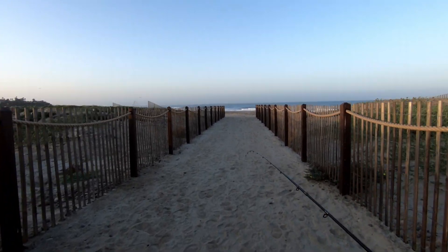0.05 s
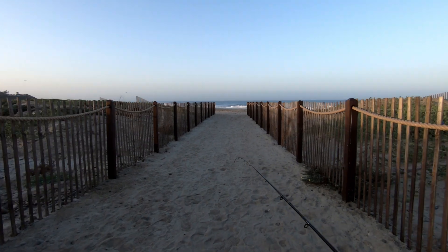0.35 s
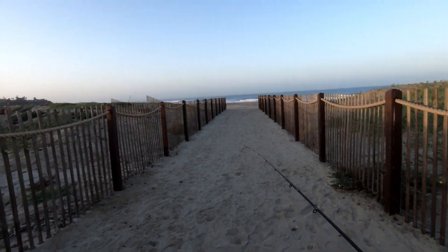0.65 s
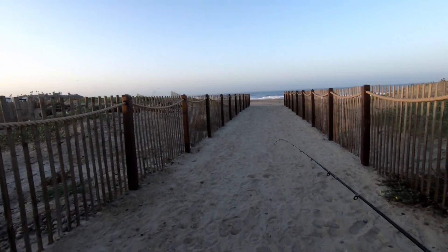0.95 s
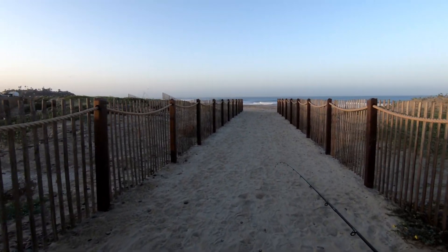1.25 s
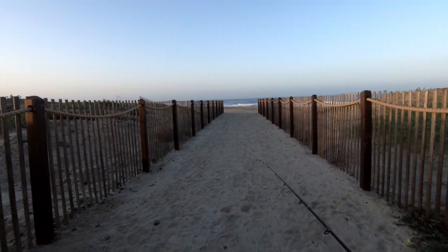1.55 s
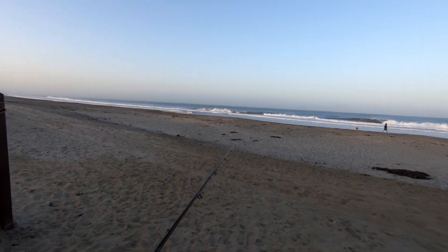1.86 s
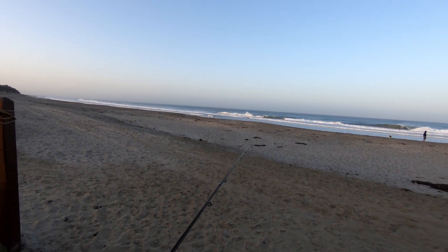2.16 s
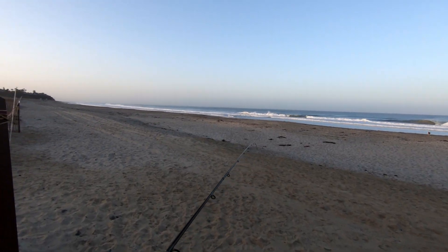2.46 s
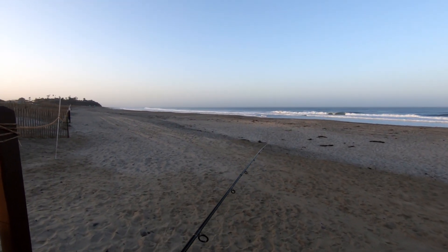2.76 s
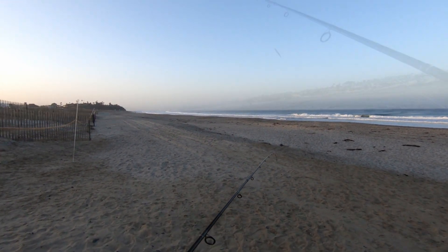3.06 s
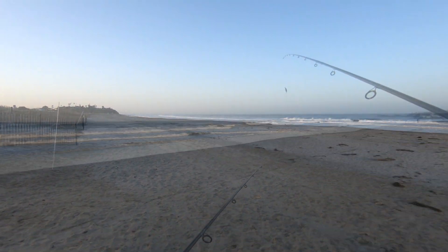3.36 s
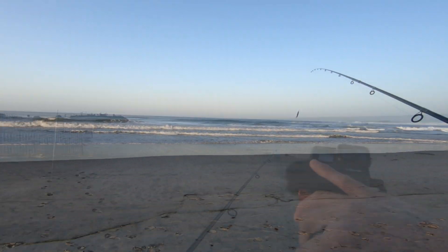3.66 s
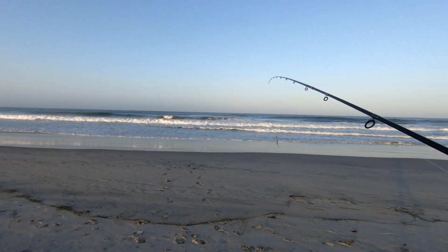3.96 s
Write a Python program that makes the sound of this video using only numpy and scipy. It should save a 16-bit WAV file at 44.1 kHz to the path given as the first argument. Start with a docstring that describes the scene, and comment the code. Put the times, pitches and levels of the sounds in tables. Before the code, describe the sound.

Fishing tackle rattles in bright ticks over soft sandy footsteps, wind rumble and surf.

```python
"""A walk over dry sand to the sea, carrying a fishing rod. From the start soft steps scuff and the
tackle rattles in bursts of tiny bright ticks, while wind rumbles on the microphone and surf washes
far away. Near two seconds the beach opens out with a low hum; the rattle gets busier and a few
footfalls thud. In the last second the rod takes a double tap and the breaking waves swell up close."""
import sys
import numpy as np
from scipy import signal
from scipy.fft import rfft, irfft, next_fast_len
from scipy.io import wavfile
from scipy.ndimage import uniform_filter1d, map_coordinates

SR = 44100
rng = np.random.default_rng(int(sys.argv[2]) if len(sys.argv) > 2 else 0)


def pcm_store(signal):
    """Save signal as 16-bit PCM."""
    levels = np.round(np.clip(np.atleast_2d(signal), -1, 1) * 32767)
    wavfile.write(sys.argv[1], SR, levels.astype(np.int16).T)


N = 176400


def tackle():
    """Small parts strike each other: loud ticks stand out of spells of fine, uneven rattling."""
    # accent ticks (time [s], level before trim [dB])
    ticks = [(0.2086, -24), (0.214, -21), (0.2176, -25), (0.2301, -25), (0.2615, -23.5), (0.2639, -30),
             (0.3342, -30), (0.3433, -33), (0.3625, -25), (0.415, -31), (0.7327, -25), (0.7361, -43),
             (0.7458, -26), (0.7588, -26), (1.2115, -37.5), (1.7515, -33.5), (1.8428, -21), (1.857, -24),
             (1.8663, -36), (1.8857, -29), (1.8906, -31), (2.0042, -28), (2.0653, -29), (2.1528, -32),
             (2.1819, -24.5), (2.2355, -27.5), (2.3068, -28), (2.3827, -28), (2.4594, -25), (2.5084, -24),
             (2.525, -38), (2.565, -34), (2.6649, -22), (2.6673, -27), (2.6702, -26), (2.7258, -18),
             (2.7348, -34), (2.7391, -23), (2.765, -24.5), (2.7891, -20), (2.8124, -19.5), (2.8927, -15),
             (2.907, -29), (2.9255, -23), (2.9306, -21), (2.9368, -27), (2.9405, -24), (2.9549, -23),
             (2.9624, -22.5), (2.9665, -24), (3.057, -27), (3.08, -20), (3.0949, -25.5), (3.2231, -17.5),
             (3.251, -26), (3.3456, -27)]
    # spells of rattling (start [s], end [s], level before trim [dB])
    rattles = [(0.122, .285, -35.5), (.31, .42, -33.5), (.705, .8, -34.5), (1.827, 1.95, -36.5),
               (1.974, 2.21, -37), (2.218, 2.36, -36), (2.361, 2.585, -33.5), (2.653, 2.845, -34),
               (2.865, 3.0, -38), (2.998, 3.14, -34.5), (3.177, 3.29, -34.5), (3.294, 3.42, -41)]
    # tone of one tick (frequency [Hz], gain [dB])
    tick_colour = [(1500, -40), (3500, -26), (5200, -16), (6850, -9), (7250, -0.5), (7700, -4.5),
                   (8300, -0.5), (8900, -3.5), (9500, -5), (10100, -2.5), (10650, -0.5), (11450, -1.5),
                   (12200, -8.5), (13800, -7), (14800, -4.5), (16000, -11)]
    ticks_per_s, spread_db, trim_db = 130, 2.5, -1.5
    contacts = list(ticks)
    for start, end, db in rattles:
        for time in np.arange(start, end, 1 / ticks_per_s):
            jitter = rng.normal(0, 0.25) / ticks_per_s
            accent_db = spread_db * np.clip(rng.normal(), -2, 2)
            contacts.append((time + jitter, db + accent_db))
    envelope = fade(t60=0.0063) + amp(-9) * fade(t60=0.029)  # sharp tick, faint tail
    return amp(trim_db) * impacts(contacts, tick_colour, envelope, snap=3.6)


def sparkle(rattle):
    """The rattle turns brighter and duller as the gear swings."""
    # high-shelf ride (time [s], gain [dB])
    shelf = [(0, 1), (.4, -1), (.75, -9), (1.8, 6), (2.25, 5), (2.4, 1), (2.8, -2), (3.05, 0), (3.4, -2)]
    shelf_hz = 12500
    treble = filtered(rattle, lambda hz: 1 - 1 / (1 + (hz / shelf_hz) ** 10))
    return rattle + (level(shelf) - 1) * treble


def metal_clacks():
    """A metal part takes harder hits and rings high and short."""
    # hits (time [s], level [dB])
    hits = [(.116, -21.5), (.119, -23.5), (0.668, -22)]
    # ring of the metal (frequency [Hz], gain [dB], t60 [s])
    modes = [(4436, -21, .022), (7100, -13, .02), (8100, -1, .011), (8300, -3.5, .012), (9550, -6, .011),
             (10400, -7, .012), (12700, -7, .012), (13400, 1, .012), (14090, -6, .012)]
    return ringing_hits(hits, modes)


def rod_taps():
    """A quick double tap sets the rod ringing."""
    # taps (time [s], level [dB])
    taps = [(3.1542, -29), (3.1565, -26)]
    # ring of the rod (frequency [Hz], gain [dB], t60 [s])
    modes = [(2579, -3, .03), (3530, 2, 0.021), (4480, -2, 0.018), (5450, -4, .014), (6520, -1.5, 0.015),
             (7940, -1, .013), (9572, -5, .013), (10500, -3, .013), (13400, -3, .013), (15300, -2, .013)]
    return ringing_hits(taps, modes)


def gear_knocks():
    """The carried gear bumps with dull midrange knocks."""
    # knocks (time [s], level [dB])
    knocks = [(.94, -35), (.947, -36), (1.08, -43), (1.579, -29.5), (1.5862, -26.5), (2.078, -30.5),
              (2.79, -34), (3.345, -31), (3.355, -30), (3.382, -32)]
    # tone of one knock (frequency [Hz], gain [dB])
    knock_colour = [(400, -13), (900, 8), (1180, 14), (1500, 4), (2000, 7), (2800, -4.5), (3500, 4.5),
                    (4300, 4), (5500, -11), (9000, -11), (16000, -23)]
    return impacts(knocks, knock_colour, fade(t60=0.021), snap=5.1)


def footsteps():
    """Sand gives and slides under the feet; the heavier steps thud."""
    # soft presses into deep sand (peak time [s], rise [s], fall [s], level [dB])
    presses = [(.4, .06, 0.15, -44.5), (.92, 0.11, 0.16, -45.5), (1.08, 0.054, 0.06, -51),
               (1.49, 0.071, 0.19, -43.5), (2.38, 0.077, 0.072, -45), (3.37, .05, 0.055, -50)]
    # their muffled tone (frequency [Hz], gain [dB])
    press_colour = [(500, 6), (1400, 5), (2200, 3), (3500, -1.5), (4800, -6.5), (6200, -3), (7500, -15),
                    (11000, -15), (16000, -26)]
    # dry grains sliding under the soles (peak time [s], rise [s], fall [s], level [dB])
    scuffs = [(.115, 0.023, 0.11, -51.5), (.21, .06, 0.057, -52), (.37, 0.059, 0.17, -49),
              (.76, 0.077, 0.21, -52), (1.08, .09, 0.087, -58.5), (1.48, 0.066, 0.26, -53),
              (1.85, 0.023, 0.23, -51), (2.39, 0.087, 0.087, -39), (2.5, 0.058, 0.078, -55.5),
              (2.68, 0.025, 0.14, -57), (2.94, 0.17, 0.2, -43.5), (3.235, 0.023, 0.041, -49),
              (3.36, 0.039, 0.058, -44.5)]
    # their bright hiss (frequency [Hz], gain [dB])
    scuff_colour = [(800, -9), (2000, -9), (3500, -5), (5200, -3), (7200, 1.5), (8700, 1), (11000, -0.5),
                    (13000, -7), (16000, -6)]
    # footfalls felt through the body (time [s], level [dB])
    thuds = [(2.029, -21), (2.521, -12), (2.785, -29)]
    thud_hz, attack_s = 66, 0.006
    out = sand_swells(presses, press_colour) + sand_swells(scuffs, scuff_colour)
    decay = fade(t60=0.083)
    t = np.arange(len(decay)) / SR
    thud = decay * (1 - np.exp(-t / attack_s)) * np.sin(2 * np.pi * thud_hz * t)
    for time, db in thuds:
        place(out, time, db, thud)
    return out


def wind():
    """Air buffets the microphone: slow sub-bass gusts with a rumble above them."""
    # gust ride (time [s], level before lift [dB])
    gust_ride = [(0.0, -14), (0.04, -31), (0.1, -21.5), (0.22, -36), (0.37, -13.5), (0.5, -20), (0.53, -17),
                 (0.66, -28.5), (0.7, -26.5), (0.98, -21), (1.14, -18.5), (1.21, -24.5), (1.28, -15),
                 (1.39, -24), (1.45, -17.5), (1.78, -23.5), (2.25, -15.5), (2.29, -21), (2.55, -14.5),
                 (2.66, -22), (2.78, -21), (4.0, -30.5)]
    # gust tone (frequency [Hz], gain [dB])
    gust_colour = [(1, -34), (5, 0), (10, 3.5), (20, -4.5), (35, -9.5), (55, -17.5), (100, -40),
                   (300, -75.5)]
    # rumble ride (time [s], level [dB])
    rumble_ride = [(0.0, -26), (0.1, -27.5), (0.44, -25.5), (0.95, -27), (0.98, -24), (1.31, -28),
                   (1.76, -25), (1.8, -25.5), (1.82, -22.5), (2.05, -21), (2.18, -25), (2.21, -21.5),
                   (2.51, -23), (2.53, -20.5), (2.6, -27), (2.77, -21), (3.33, -25.5), (4.0, -23.5)]
    # rumble tone (frequency [Hz], gain [dB])
    rumble_colour = [(5, -27), (20, -11), (50, 1.5), (80, 1.5), (125, -2.5), (220, -5.5), (320, -14),
                     (480, -26), (1000, -38.5), (3000, -74)]
    lift_db = 2
    gusts = amp(lift_db) * level(gust_ride) * noise_bed(gust_colour, patchy_db=-0.67)
    rumble = level(rumble_ride) * noise_bed(rumble_colour, patchy_db=0.46)
    return gusts + rumble


def surf():
    """Breaking waves wash down the fenced path, across the open beach, then close at the water's edge."""
    # surf ride at each spot (time [s], level [dB])
    path_ride = [(0, -32), (.25, -32), (.45, -34), (.7, -31.5), (1.05, -35.5), (1.35, -35), (1.7, -39),
                 (2.1, -53), (4, -57)]
    beach_ride = [(0, -51), (1.3, -44), (1.85, -32.5), (2.4, -34), (2.8, -35), (3.2, -35.5), (4, -35)]
    near_ride = [(0, -87), (3.0, -67), (3.2, -34.5), (3.4, -28), (3.6, -24.5), (3.8, -22), (4, -20)]
    # surf tone at each spot (frequency [Hz], gain [dB])
    path_colour = [(100, -12), (400, -3), (560, -4), (800, 2), (1150, -2.5), (1500, -9), (2200, -20),
                   (3300, -24.5), (4800, -35), (6200, -31), (7500, -36), (11000, -42), (16000, -57)]
    beach_colour = [(100, -4.5), (400, 1.5), (800, 1), (1200, -3.5), (1600, -8.5), (2200, -18), (3000, -23),
                    (4200, -25), (6000, -38.5), (16000, -51)]
    near_colour = [(71, -36), (120, -8.5), (306, 0.5), (383, -2), (469, -4.5), (780, -9), (846, -7),
                   (917, -9.5), (995, -11), (1380, -16.5), (2030, -30), (4130, -28), (6870, -40),
                   (10700, -37.5), (15500, -51)]
    path = level(path_ride) * noise_bed(path_colour, patchy_db=1.35)
    beach = level(beach_ride) * noise_bed(beach_colour, patchy_db=1.5)
    near = level(near_ride) * noise_bed(near_colour, patchy_db=0.45)
    return path + beach + near


def beach_hum():
    """A low hum out on the open beach wavers in pitch and level."""
    # hum ride (time [s], level [dB])
    ride = [(0, -48), (1.75, -44), (2.0, -27), (2.6, -29), (3.05, -26.5), (3.3, -36.5), (4, -51)]
    hum_hz, wander_rad, waver_db = 97, 0.79, 3.2
    phase = 2 * np.pi * hum_hz * np.arange(N) / SR + wander_rad * wobble(7)
    return level(ride) * unit(np.sin(phase) * amp(waver_db * wobble(12)))


def impacts(hits, colour, envelope, snap):
    """Each contact is a snap and a dying crackle through one resonant body."""
    out, response = np.zeros(N), body(colour)
    for time, db in hits:
        force = envelope * rng.standard_normal(len(envelope))
        force[0] = snap
        place(out, time, db, signal.fftconvolve(force, response))
    return out


def ringing_hits(hits, modes):
    """Each hit is a noisy crack and a brief ring, its modes balanced anew."""
    # tone of the crack (frequency [Hz], gain [dB])
    crack_colour = [(1000, -20), (2600, -10.5), (5500, -8), (7500, -0.5), (10000, -0.5), (13500, -5),
                    (16000, -7)]
    out, decay = np.zeros(N), fade(t60=0.016)
    t = np.arange(len(decay)) / SR
    for time, db in hits:
        ring = np.zeros(len(t))
        for hz, mode_db, t60 in modes:
            gain = amp(mode_db + rng.normal(0, 1.6))
            ring += gain * fade(t60) * np.sin(2 * np.pi * (hz * t + rng.random()))
        crack = signal.lfilter(body(crack_colour), 1, decay * rng.standard_normal(len(t)))
        place(out, time, db, ring + 2.88 * crack)
    return out


def sand_swells(strokes, colour):
    """Grainy noise that swells and fades by 10 dB in each rise and fall time."""
    t = np.arange(N) / SR
    swell = sum(amp(db - 10 * np.maximum((peak - t) / rise, (t - peak) / fall))
                for peak, rise, fall, db in strokes)
    grain_db = 4
    return swell * unit(noise_bed(colour, patchy_db=1.2) * amp(grain_db * wobble(700)))


def noise_bed(colour, patchy_db):
    """Coloured noise of rms 1 with patches of random gain across time and frequency."""
    spectra = signal.stft(rng.standard_normal(N), nperseg=512)[2]
    patches = uniform_filter1d(rng.standard_normal(spectra.shape), size=5, axis=0)
    patches = uniform_filter1d(patches, size=14, axis=1)
    noise = signal.istft(spectra * amp(patchy_db * unit(patches)), nperseg=512)[1][:N]
    return unit(filtered(noise, lambda hz: gains(colour, hz)))


def body(colour, size=512):
    """Minimum-phase impulse response with the given colour."""
    cepstrum = irfft(np.log(gains(colour, np.fft.rfftfreq(size, 1 / SR))))
    cepstrum[1:size // 2] *= 2
    cepstrum[size // 2 + 1:] = 0
    return irfft(np.exp(rfft(cepstrum)))


def place(out, time, db, sound):
    """Mix a sound in at a time in seconds, its loudest millisecond at db."""
    peak = np.sqrt(uniform_filter1d(sound ** 2, size=44).max())
    part = out[max(round(time * SR), 0):][:len(sound)]
    part += amp(db) * sound[:len(part)] / peak


def fade(t60, size=4096):
    """A decay that falls 60 dB in t60 seconds."""
    return np.exp(-np.log(1000) * np.arange(size) / SR / t60)


def wobble(rate):
    """A smooth random curve, rate knots a second."""
    return map_coordinates(rng.standard_normal(N + 4), [np.arange(N) * rate / SR])


def level(ride):
    """Gain per sample from a fader ride (time [s], level [dB])."""
    return amp(np.interp(np.arange(N) / SR, *np.transpose(ride)))


def gains(colour, hz):
    """Gain at hz of an EQ curve (frequency [Hz], gain [dB]) on a log axis."""
    knots_hz, db = np.transpose(colour)
    return amp(np.interp(np.log(hz + 1), np.log(knots_hz + 1), db))


def filtered(x, response):
    """Equalise x with a gain given as a function of frequency."""
    size = next_fast_len(N + 8192)
    return irfft(rfft(x, size) * response(np.fft.rfftfreq(size, 1 / SR)), size)[:N]


def amp(db):
    """Decibels to gain."""
    return 10 ** (np.asarray(db) / 20)


def unit(x):
    """Scale to rms 1."""
    return x / np.sqrt(np.mean(x ** 2) + 1e-20)


def scene():
    """Gear, feet, wind, sea and hum in one mono mix."""
    gear = sparkle(tackle()) + metal_clacks() + rod_taps() + gear_knocks()
    return (gear + footsteps() + wind() + surf() + beach_hum())[None]


def record(dry):
    """A brick-wall low-pass takes off the very top."""
    cutoff_hz = 15850
    return filtered(dry[0], lambda hz: hz < cutoff_hz)[None]


dry = scene()
out = record(dry)
pcm_store(out)
```